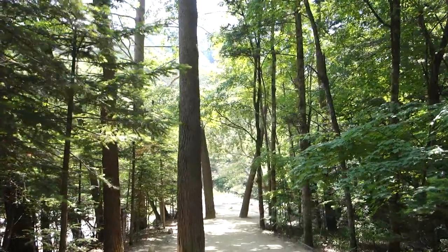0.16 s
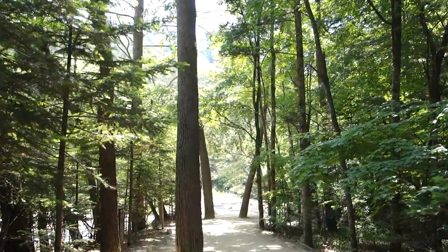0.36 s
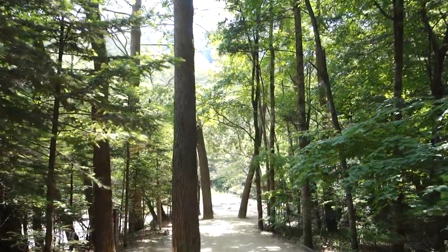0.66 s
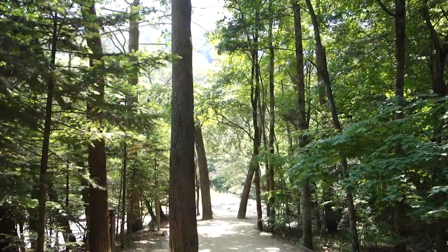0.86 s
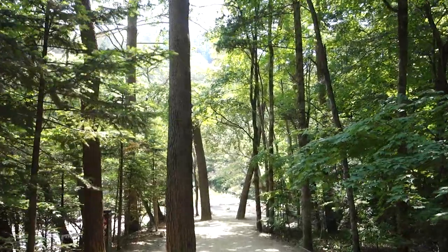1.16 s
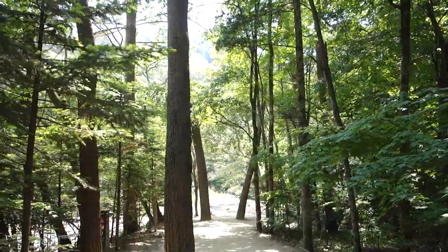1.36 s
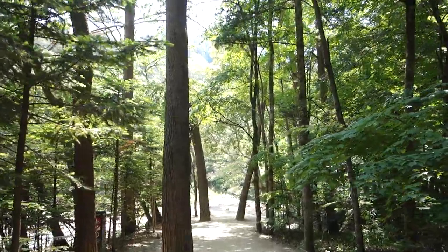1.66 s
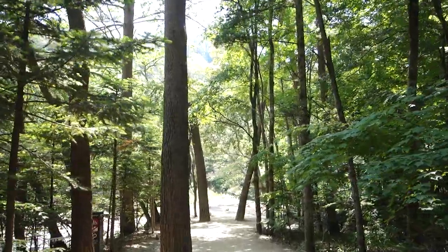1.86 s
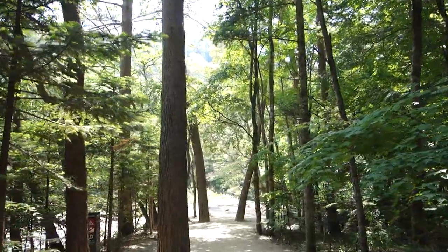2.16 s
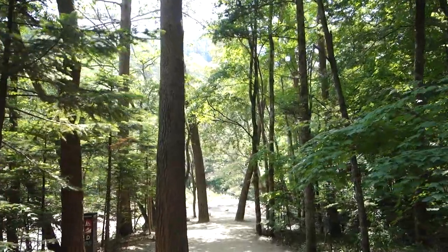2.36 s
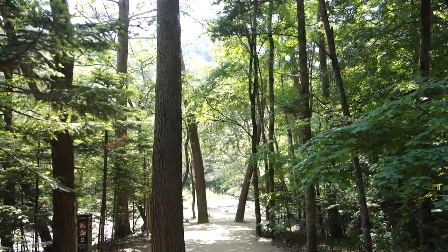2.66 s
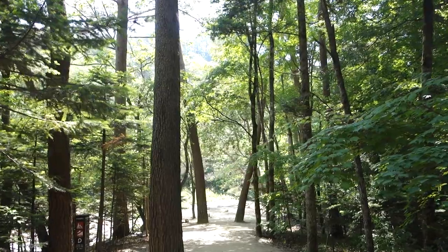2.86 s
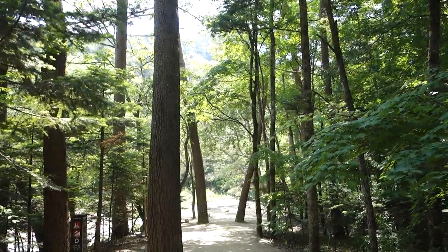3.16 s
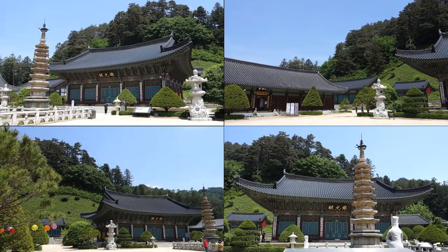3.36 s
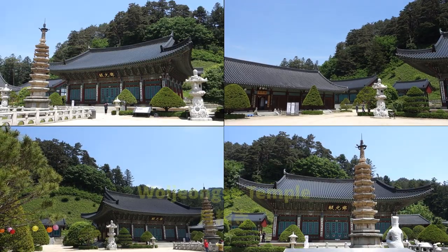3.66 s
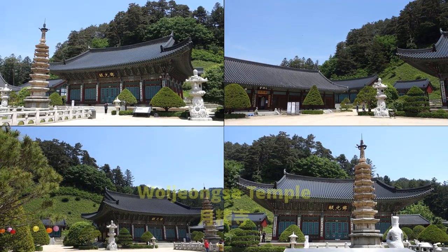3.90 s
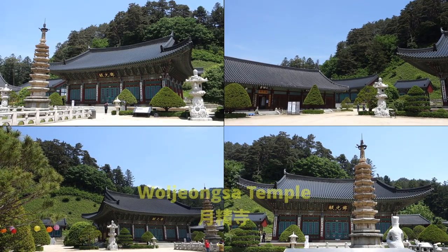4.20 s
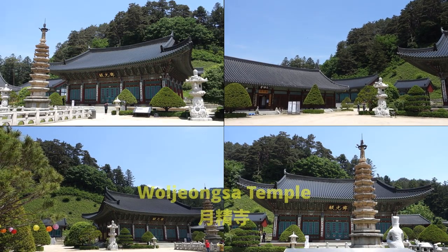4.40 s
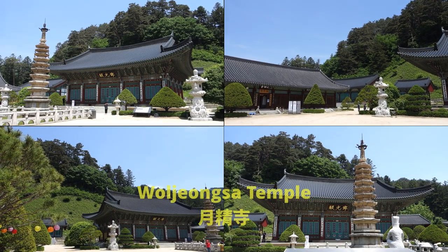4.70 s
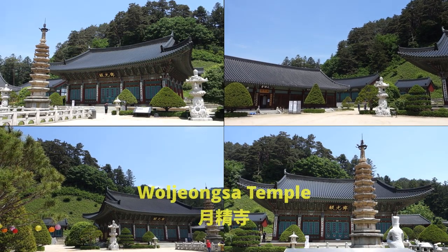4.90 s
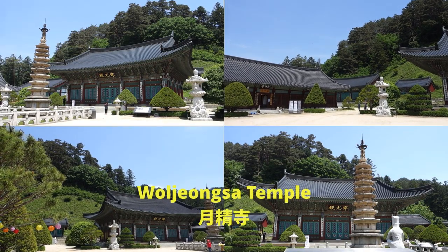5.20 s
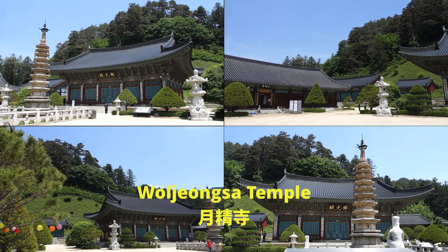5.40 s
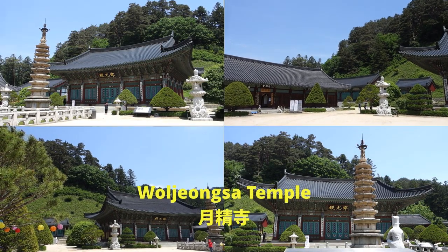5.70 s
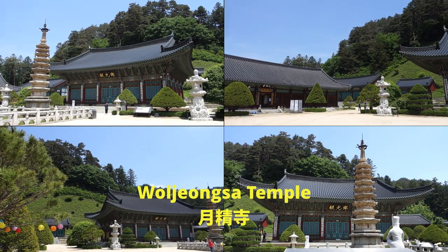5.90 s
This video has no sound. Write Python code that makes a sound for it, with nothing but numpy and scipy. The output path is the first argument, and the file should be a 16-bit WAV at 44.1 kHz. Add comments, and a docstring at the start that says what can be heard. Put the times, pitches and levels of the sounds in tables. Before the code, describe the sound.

Smooth rushing water and clear chirping birds, soft handling bumps, then a hard switch to faint open air, distant birds and low wind thuds.

```python
"""A stream rushes close by on a forest path, birds whistle over it and the camera body thumps softly.
A hard cut leads to an open yard: faint air, fainter birds, and wind buffeting two close mic ports.
One very short, faint burst of high noise falls late. Stream, air and wind are shaped stereo noise; the birds
are gliding tones, trills and harsh chips with echoes; handling is low noise with short sine swings."""
import sys
import numpy as np
from scipy import signal
from scipy.fft import rfft, irfft, next_fast_len
from scipy.io import wavfile
from scipy.ndimage import uniform_filter1d, map_coordinates

SR = 44100
rng = np.random.default_rng(int(sys.argv[2]) if len(sys.argv) > 2 else 0)


def unload_audio(sound):
    """Save the sound as a 16-bit wav file, at the path given as the first command line argument."""
    columns = np.transpose(np.atleast_2d(sound))
    # keep every value between -1 and 1, then stretch to whole-number steps
    steps = np.round(np.clip(columns, -1, 1) * 32767)
    wavfile.write(sys.argv[1], SR, steps.astype(np.int16))


N = 266672
CUT_S = 3.3023  # the path gives way to the yard


def amp(db):
    """Gain of a level in dB."""
    return 10 ** (np.asarray(db) / 20)


def unit(x):
    """x at rms 1."""
    return x / np.sqrt(np.mean(x ** 2) + 1e-20)


def along(points, hz):
    """Read (f/Hz, value) points on a log frequency axis."""
    f, v = np.transpose(points)
    return np.interp(np.log(hz + 1), np.log(f + 1), v)


def curves(rows):
    """One value per sample for each column after the time."""
    s, *cols = np.transpose(rows)
    return [np.interp(np.arange(N) / SR, s, c) for c in cols]


def wobble(rate):
    """A smooth random curve with `rate` random knots a second."""
    knots = rng.standard_normal(int(N * rate / SR) + 4)
    return map_coordinates(knots, [np.arange(N) * rate / SR])


def sides(pan_db):
    """Left and right gains for a left-right difference, keeping the power."""
    pair = amp(np.array([pan_db / 2, -pan_db / 2]))
    return pair / np.sqrt(np.mean(pair ** 2, axis=0))


def filtered(x, response):
    """x times a complex response of frequency."""
    m = next_fast_len(N + SR // 2)
    return irfft(rfft(x, m) * response(np.fft.rfftfreq(m, 1 / SR)), m)[..., :N]


def rush(spectrum, alike, patchy_db):
    """Stereo noise of rms 1: random gain in time-frequency patches, then a spectrum and left-right likeness."""
    z = signal.stft(rng.standard_normal((2, N)), nperseg=512)[2]
    field = rng.standard_normal(z.shape[1:])
    field = uniform_filter1d(field, size=6, axis=0)  # along frequency
    field = uniform_filter1d(field, size=10, axis=1)  # along time
    patchy = signal.istft(z * amp(patchy_db * unit(field)), nperseg=512)[1][:, :N]

    def mid_side_gain(hz):
        turn = np.arccos(np.clip(along(alike, hz), -1, 1)) / 2  # more side makes the ports less alike
        return amp(along(spectrum, hz)) * [np.cos(turn), np.sin(turn)]

    mid, side = filtered(patchy, mid_side_gain)
    return unit(np.array([mid + side, mid - side]))


def stream():
    """Countless bubbles blur into a smooth rush that reaches the left port first."""
    # spectrum of the water: f/Hz, relative level/dB per Hz
    water_spectrum = [(60, -38), (100, -28.5), (185, -14), (630, -1.5), (1300, -2), (2200, -5), (4060, -13),
                      (8000, -28.5), (15800, -31)]
    # likeness of the ports: f/Hz, left-right correlation
    water_alike = [(550, 0.99), (1650, 0.88), (4970, 0.4), (15000, 0.045)]
    # balance of the ports: f/Hz, left over right/dB
    water_pan = [(180, 0.0), (550, 1), (1650, 3.5), (4970, -3), (15000, -2)]
    lead_s = .00004  # left ahead of right
    water = rush(water_spectrum, water_alike, patchy_db=0.7) * amp(-56.5)

    def port_response(hz):
        half_lead = np.exp(1j * np.pi * np.outer([1, -1], hz * lead_s))
        return sides(along(water_pan, hz)) * half_lead

    return filtered(water, port_response)


def birds():
    """Each call flutters, sits at its own left-right place and gets a scattered, decaying echo off the trees."""
    # whistled notes, and one faint lingering tail of a note (at 5.252 s): start t/s, length/s,
    # turn as share of length, first f/Hz, turn f/Hz, last f/Hz,
    # rms level at the turn/dB before flutter and panning
    note_rows = [ (0.639, 0.075, 0.85, 4400, 4300, 4280, -61),
                 (0.774, 0.068, 0.73, 4360, 4230, 4180, -55.5), (0.827, 0.071, 0.48, 4340, 4350, 4235, -47),
                 (0.965, 0.045, .3, 3500, 4660, 4760, -58.5), (1.25, 0.039, 0.48, 3120, 2830, 2850, -56),
                 (1.66, 0.018, 0.43, 4320, 4680, 5130, -62), (1.677, 0.029, 0.68, 3650, 3970, 3570, -52),
                 (1.72, 0.0462, 0.34, 4290, 3930, 3560, -51.5),
                 (1.846, 0.013, 0.35, 6520, 4510, 5420, -53.5), (1.913, 0.024, .4, 4590, 4640, 4580, -54),
                 (1.945, 0.065, 0.23, 4600, 4590, 4550, -72), (2.067, 0.042, 0.65, 5270, 6170, 5680, -58),
                 (2.106, 0.029, 0.46, 5770, 5770, 5680, -57), (2.19, 0.092, 0.42, 3520, 3030, 2940, -57),
                 (2.281, 0.02, 0.45, 4150, 4280, 4870, -55.5),
                 (2.301, 0.019, 0.59, 5000, 4080, 4050, -54.5), (2.315, 0.039, 0.39, 3780, 3800, 3840, -61),
                 (2.672, 0.062, 0.53, 3800, 3190, 3170, -61.5),
                 (2.78, 0.038, 0.75, 5090, 5010, 5300, -65.5), (2.816, 0.015, .5, 4140, 4250, 4330, -61.5),
                 (2.85, 0.058, 0.63, 5210, 5066, 4900, -59.5), (2.93, .036, 0.48, 5200, 5100, 5050, -70),
                 (3.86, 0.054, 0.51, 4350, 4260, 4100, -72.5), (3.96, .03, .7, 4470, 4560, 4800, -84),
                 (3.988, .042, .3, 4800, 5400, 3500, -82), (4.004, 0.079, 1, 4340, 4320, 4180, -71),
                 (4.136, 0.08, 0.59, 3120, 3800, 4370, -65.5), (4.207, 0.017, .3, 4380, 4340, 3420, -63.5),
                 (4.266, 0.02, .6, 5400, 5900, 6600, -70.5), (4.314, 0.043, 0.34, 6440, 6040, 5600, -70),
                 (4.584, 0.021, 0.7, 5170, 5440, 5470, -69.5), (4.603, 0.038, 0.34, 5300, 4600, 4100, -61),
                 (4.628, 0.029, 0.68, 4300, 3720, 3350, -63), (4.689, 0.057, 0.56, 3415, 3275, 2980, -62),
                 (4.902, 0.029, 0.39, 3190, 3960, 2880, -63.5), (5.19, .08, 0.38, 5050, 4720, 4700, -87),
                 (5.215, 0.042, 0.55, 3950, 3840, 3950, -67), (5.252, 0.078, .4, 3920, 3950, 3900, -79),
                 (5.282, 0.042, 0.34, 5350, 5200, 5250, -66), (5.36, 0.11, 0.29, 4890, 4510, 4270, -62),
                 (5.443, 0.058, 0.59, 4360, 3564, 3550, -60), ]
    # trilled notes: the columns of a note (level before throb), a pitch top t/s, trill rate/Hz,
    # pitch swing/Hz, throb (0-1)
    trill_rows = [(1.142, 0.074, 0.45, 3330, 3320, 3380, -62.5, 1.173, 70, 120, .6),
                  (1.2, 0.054, 0.49, 3700, 3750, 3150, -58, 1.227, 54.3, 200, 0.62),
                  (1.888, 0.054, 0.69, 3600, 4200, 4200, -57, 1.918, 80, 300, 0.44),
                  (4.55, 0.035, 0.34, 4300, 4120, 3030, -73.5, 4.565, 75, 150, 0.68),
                  (4.81, 0.071, 0.38, 3250, 4030, 7240, -65, 5.4, 68.9, 260, 0.11),
                  (5.045, 0.069, 0.37, 2380, 2480, 2470, -72.5, 5.3, 50.8, 60, 0.54)]
    # harsh chips: start t/s, length/s, from f/Hz, to f/Hz, spread/Hz, rms level/dB before flutter and panning
    chip_rows = [(0.923, 0.024, 6200, 4850, 600, -76), (0.994, 0.061, 5980, 5650, 656, -68),
                 (1.153, 0.061, 2850, 2700, 170, -68), (3.73, 0.016, 8300, 5500, 704, -83),
                 (4.44, 0.012, 4400, 3830, 350, -75), (4.457, 0.01, 4450, 3700, 348, -74),
                 (4.475, 0.0088, 4550, 4200, 200, -73), (4.732, .03, 3110, 2870, 350, -72.5),
                 (5.015, .09, 2920, 3140, 169.6, -78), (5.113, 0.016, 3380, 2500, 250, -77),
                 (5.586, 0.014, 5270, 4950, 200, -75)]
    echo_t60_s, echo_db = (0.67, 0.52), (-6, -6.5)  # among the trunks, in the yard; dB before the leaf filter
    out, echoes = np.zeros((2, 2, N))
    flutter = amp(1.3 * wobble(150))
    waver = 1 + .0025 * wobble(160)  # pitch unsteadiness as a factor
    t = np.arange(SR // 2) / SR
    calls = [whistle(waver, *row) for row in note_rows + trill_rows]
    calls += [rasp(*row) for row in chip_rows]
    for s, call in calls:
        start, place = round(s * SR), int(s > CUT_S)
        call = call * flutter[start:start + len(call)]
        decay = amp(-60 * t / echo_t60_s[place]) * (1 - np.exp(-t / 0.00069))
        tail = rng.standard_normal((2, len(t))) * decay
        tail[1] = .5 * tail[0] + 1.5 * tail[1]  # the right echo is stronger and only partly like the left
        tail = tail / np.linalg.norm(tail[0])
        echo = signal.fftconvolve(call[None], tail, axes=1)[:, :N - start]
        echoes[:, start:][:, :echo.shape[1]] += amp(echo_db[place]) * echo
        out[:, start:][:, :len(call)] += sides(rng.normal(-.2, 1))[:, None] * call
    # leaves scatter high notes more than low ones, and their stirring blurs the echo
    echoes = filtered(echoes, lambda hz: hz ** 5 / (hz ** 5 + 3400 ** 5))
    stirring = amp(3.5 * np.array([wobble(170), wobble(170)]))
    return out + echoes * stirring


def whistle(waver, s, length, turn, first_hz, turn_hz, last_hz, db, top_s=0, rate_hz=0, swing_hz=0, throb=0):
    """Start and sound of one gliding, unsteady tone; a trill swings pitch and level at one rate."""
    swell_db, fade_db = 7.5, 9  # a note rounds up to its turn and rounds off after it
    edge_s = .01
    bounce, bounce_s = .42, (.003, .006)  # strength relative to the direct call, range of delay
    t = np.arange(s - edge_s / 2, s + length + edge_s / 2, 1 / SR)
    knots = s + length * np.array([0, turn, 1])
    edges = np.clip(np.minimum(t - t[0], t[-1] - t) / edge_s, 0, 1)
    beat = np.cos(2 * np.pi * rate_hz * (t - top_s))
    trill = swing_hz * beat * np.sin(np.pi * (t - t[0]) / (t[-1] - t[0]))  # widest mid-note
    glide = uniform_filter1d(np.interp(t, knots, [first_hz, turn_hz, last_hz]), size=200)
    pitch = glide * waver[round(t[0] * SR):][:len(t)] + trill
    drop_db = np.interp(t, knots, np.sqrt([swell_db, 0, fade_db])) ** 2
    level = amp(db - drop_db) * edges * (1 + throb * beat)
    # a bounce off a near branch beads a gliding note: its level ripples as the pitch moves
    ripple = np.cos(2 * np.pi * (glide - turn_hz) * rng.uniform(*bounce_s))
    level = level * (1 + bounce * ripple) / (1 + bounce)
    return t[0], np.sqrt(2) * level * np.sin(2 * np.pi * np.cumsum(pitch) / SR)


def rasp(s, length, from_hz, to_hz, spread_hz, db):
    """Start and sound of a harsh chip: a gliding tone whose pitch shakes so fast that it blurs into a band."""
    t = np.arange(0, length, 1 / SR)
    scatter = map_coordinates(rng.standard_normal(300), [2 * spread_hz * t])
    pitch = from_hz + (to_hz - from_hz) * t / length + spread_hz * scatter
    phase = 2 * np.pi * np.cumsum(pitch) / SR
    return s, 2 * amp(db) * np.sin(np.pi * t / length) * np.sin(phase)


def wind():
    """Big slow eddies thud on each port almost separately; smaller ones add a higher roar."""
    # gusts thudding on the ports: t/s, level/dB
    gust_rows = [(3.33, -47.5), (3.41, -40), (3.53, -56), (3.8, -49), (4.14, -44.5), (4.23, -54.5),
                 (4.36, -43.5), (4.56, -44.5), (4.8, -43), (5.01, -37.5), (5.06, -45), (5.29, -37.5),
                 (5.52, -50.5), (5.61, -40), (5.78, -46), (5.86, -35), (5.95, -51.5), (6.02, -39.5)]
    # slow drift of the wind: t/s, left over right/dB (halved for the roar), roar level/dB
    drift_rows = [(3.4, -12, -68.5), (3.8, -6.5, -66.5), (4.45, -7, -56.5), (5.0, -11, -57.5),
                  (5.35, -6.5, -55.5), (6.0, -5.5, -54)]
    # spectra of the big and the small eddies: f/Hz, relative level/dB per Hz
    thud_spectrum = [(6, -23), (14, 1.5), (40, 2), (90, -12.5), (700, -110)]
    roar_spectrum = [(40, -17), (100, 1), (170, -7), (340, -22), (3000, -100)]
    level_db, = curves(gust_rows)
    pan_db, roar_db = curves(drift_rows)
    eddies = rush(thud_spectrum, [(30, 0.086)], patchy_db=2.0)
    # even out the swings so that the gusts set how big they are
    size = np.sqrt(np.abs(uniform_filter1d(eddies ** 2, size=4000, axis=1)) + 0.07)
    thuds = amp(level_db) * sides(pan_db) * unit(eddies / size)
    lumps = amp(2.1 * wobble(12))
    roar = unit(lumps * rush(roar_spectrum, [(150, 0.67)], patchy_db=1.5))
    return thuds + amp(roar_db) * sides(pan_db / 2) * roar


def handling():
    """The hand shifts on the body: a lumpy low rumble, and one-swing thumps alike at both ports."""
    # low rumble of the grip: t/s, level/dB
    grip_rows = [(0, -93), (1.1, -92), (1.35, -71), (1.9, -89), (2.4, -78), (3.1, -83), (3.3, -75)]
    # soft thumps through the body: middle t/s, level/dB of the sine before its bell-shaped window, f/Hz
    thump_rows = [(1.124, -65.5, 108), (1.345, -57, 100), (1.712, -48, 203), (2.785, -54, 161)]
    # spectrum of the rumble: f/Hz, relative level/dB per Hz
    grip_spectrum = [(15, -50), (40, -29), (100, -8), (2000, -65)]
    level_db, = curves(grip_rows)
    lumps = amp(4.5 * wobble(15))
    out = amp(level_db) * unit(lumps * rush(grip_spectrum, [(90, 0.83)], patchy_db=4.5))
    t = np.arange(-SR // 20, SR // 20) / SR
    for s, db, hz in thump_rows:
        push = np.sin(2 * np.pi * hz * t) * np.exp(-(t * hz / 0.45) ** 2)
        out[:, round(s * SR) - SR // 20:][:, :len(t)] += amp(db) * push
    return out


def yard_air():
    """Faint steady air of the open place as broad noise."""
    # spectrum of the air: f/Hz, relative level/dB per Hz
    air_spectrum = [(100, -10.5), (300, -4.5), (1000, -7.5), (2500, -14.5), (4800, -19), (8000, -29),
                    (16000, -32.5)]
    # likeness of the ports: f/Hz, left-right correlation
    air_likeness = [(200, 0.74), (2000, 0.51), (9000, 0.024)]
    return amp(-70.5) * rush(air_spectrum, air_likeness, patchy_db=0.73)


def high_burst():
    """One very short, faint burst of high noise, dying by 60 dB in 6 ms."""
    # the burst: t/s, starting rms level/dB before the high-pass
    burst_rows = [(5.894, -61)]
    out = np.zeros((2, N))
    t = np.arange(SR // 100) / SR
    for s, db in burst_rows:
        burst = amp(db - 60 * t / .006) * rng.standard_normal((2, len(t)))
        out[:, round(s * SR):][:, :len(t)] += burst
    return filtered(out, lambda hz: 1 / (1 + (10500 / (hz + 1)) ** 8))


def scene():
    """The path, then the yard; the wind fades in over 4 ms after the cut, and birds call in both places."""
    since_cut = np.arange(N) / SR - CUT_S
    gusts = wind() * np.clip(since_cut / .004, 0, 1)
    places = np.where(since_cut < 0, stream() + handling(), yard_air() + high_burst())
    return places + gusts + birds()


def record(dry):
    """The camera keeps nothing above its band limit, 15800 Hz."""
    return filtered(dry, lambda hz: hz < 15800)


dry = scene()
out = record(dry)
unload_audio(out)
```